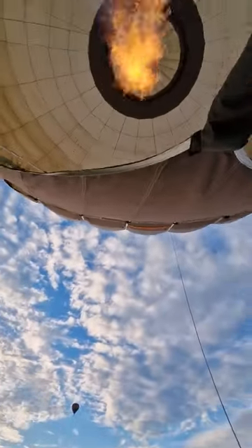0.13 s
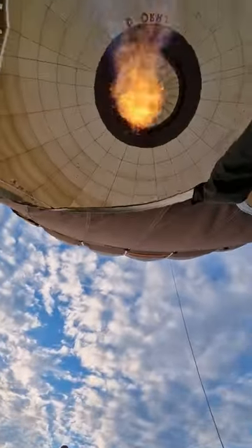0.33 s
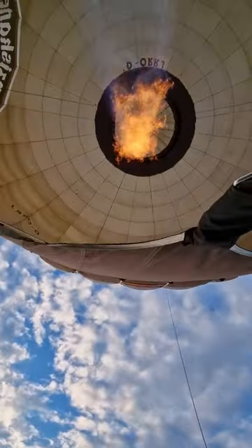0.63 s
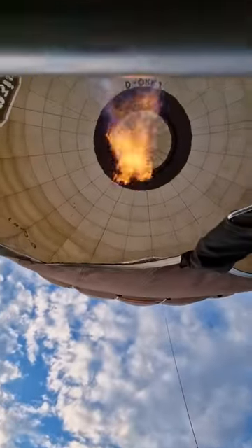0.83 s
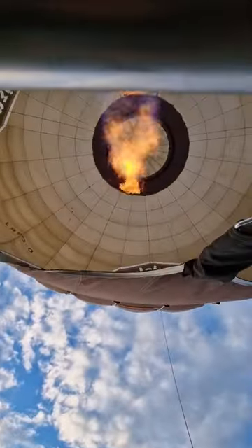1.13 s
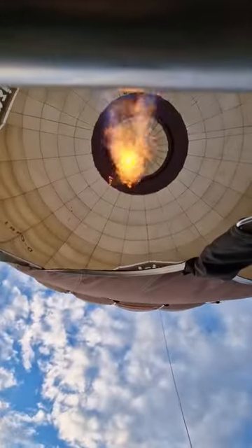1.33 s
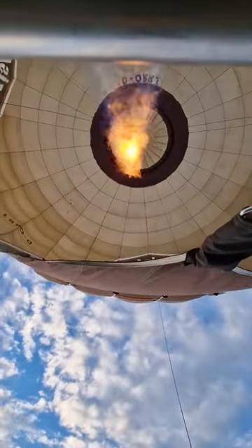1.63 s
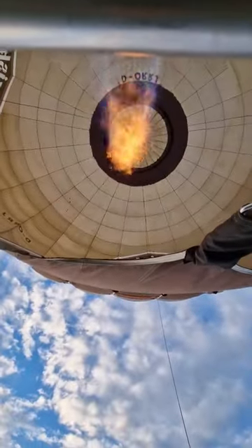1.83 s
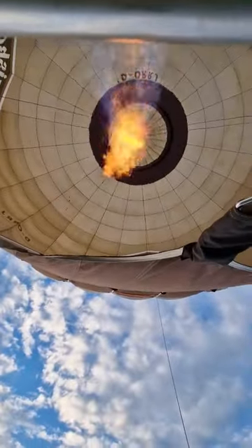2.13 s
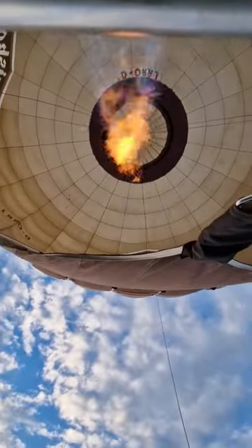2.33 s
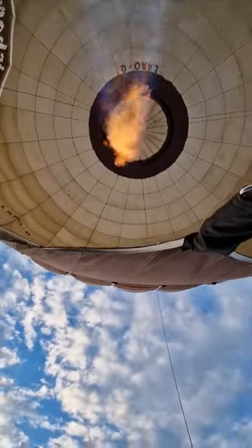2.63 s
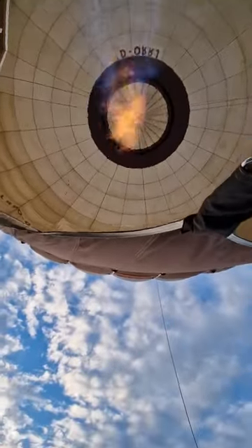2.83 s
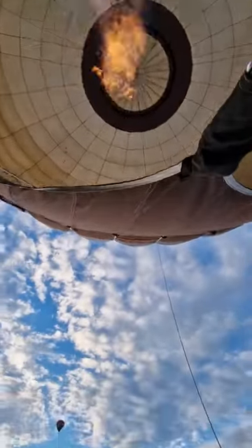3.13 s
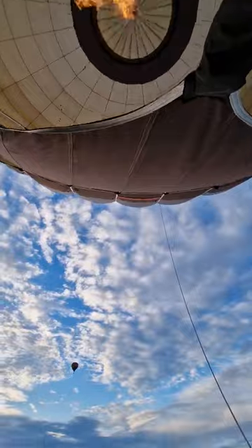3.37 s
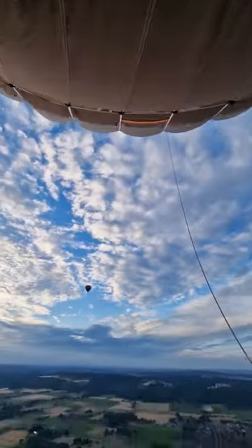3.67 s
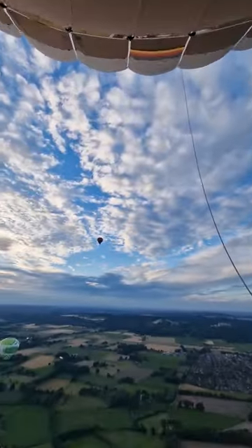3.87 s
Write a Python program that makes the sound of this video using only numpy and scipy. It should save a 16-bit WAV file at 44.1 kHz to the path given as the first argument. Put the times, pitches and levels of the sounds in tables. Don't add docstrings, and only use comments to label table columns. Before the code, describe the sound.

Loud steady gas flame roar and jet hiss from a balloon basket outdoors, captured close by a stereo phone, slightly stronger on the left; the valve shuts and only a thin, breathy pilot flame remains.

```python
import sys
import numpy as np
from scipy import signal
from scipy.fft import rfft, irfft
from scipy.io import wavfile
from scipy.ndimage import uniform_filter1d, minimum_filter1d, map_coordinates

SR = 44100
rng = np.random.default_rng(int(sys.argv[2]) if len(sys.argv) > 2 else 0)


def makeup_ratio(level_db):
    decades = np.asarray(level_db, float) / 20
    return 10 ** decades


def dump(signal):
    limited = np.clip(np.atleast_2d(signal).T, -1, 1)
    pcm = np.round(limited * 32767).astype(np.int16)
    wavfile.write(sys.argv[1], SR, pcm)


N = 176400
SECONDS = np.arange(N) / SR
HZ = np.maximum(np.arange(N // 2 + 1) * SR / N, 1)

# time in seconds, level in dB.
GAS_PRESSURE = [(0, 2), (1, 0.5), (2.7, -0.64), (2.95, -1.5), (3.2, -5.5), (3.4, -9), (3.5, -15.5),
                (3.56, -26), (3.62, -37), (3.75, -66), (4, -111)]
# pitch in Hz, dB of sound per dB of pressure.
PRESSURE_EFFECT = [(100, 0.25), (500, 0.51), (1500, 0.63), (6000, 0.86), (13000, 1.3)]
# pitch in Hz, level in dB.
FLAME_ROAR = [(25, -25), (45, -4), (65, 0.5), (200, -1), (330, -5), (550, -13), (1000, -19.5), (3000, -35)]
# pitch in Hz, level in dB.
JET_HISS = [(300, -49), (1200, -33.5), (2500, -26), (4000, -29), (6500, -24.5), (9000, -30.5), (12000, -27),
            (15500, -29.5)]
# pitch in Hz, width in Hz, boost in dB.
PILOT_HOLES = [(1110, 150, 2), (2210, 310, 5), (3200, 360, 9.5), (5200, 700, 9), (6050, 300, 7),
               (8320, 370, 13.5), (13600, 800, 9)]
# pitch in Hz, level in dB.
PILOT_BREATH = [(30, -7), (80, 4.5), (180, -4), (330, -8), (600, -17), (900, -33), (4000, -25),
                (15500, -32)]
# pitch in Hz, width in Hz, boost in dB.
PILOT_AT_RIGHT = [(890, 380, 11), (2210, 1500, 2), (5800, 3400, 2), (11000, 6400, 4)]
# pitch in Hz, width in Hz, change in dB.
LEFT_PORT = [(520, 115, 3), (698, 190, -3.5), (1078, 227, 6), (1206, 150, -1.5), (1478, 170, 5),
             (1750, 130, -1), (1970, 180, 1.5), (2670, 250, -3), (5000, 2300, -2), (6600, 400, 0.2),
             (7440, 820, 5), (8300, 270, 3), (8600, 620, 1), (14950, 3800, 6)]
RIGHT_PORT = [(471, 122, -4.5), (830, 190, -2.5), (1324, 380, 5.5), (1750, 430, 0), (2550, 370, -1.5),
              (4930, 1500, 4), (6300, 430, 0.5), (7300, 900, 1), (11800, 2000, 4), (15400, 2000, 4.5)]
# pitch in Hz, width in Hz, change in dB.
HAND_SHADOW = [(8250, 740, -10), (9620, 2300, -15.5)]
# pitch in Hz, share from 0 to 1.
ALIKE = [(60, .999), (500, 0.98), (1500, 0.85), (3000, 0.82), (5000, 0.67), (7500, 0.48), (8500, .15),
         (15000, 0.3)]
# time in seconds, lag of the right port in ms, share of the hand's shadow on it from 0 to 1.
TILT = [
    (0, .52, 0.6),
    (.3, .52, 0.7),
    (.7, 0.5, .97),
    (1.5, 0.5, .99),
    (2.5, 0.49, .99),
    (3.05, .512, 0.9),
    (3.52, 0.506, 0.7),
    (3.68, 0.41, 0.8),
    (4, 0.37, 0.8),
]
# pitch in Hz, lag in radians.
BENDING = [(60, -0.56), (200, -0.1847), (800, 0.24), (1500, 0.52), (2700, 0.37), (4000, 0.28), (5500, 0.6),
           (7600, 4.5)]

FLAME_OUT_S, FLAME_DIES_DB_S, FLAME_FADE_TOP_HZ = 3.545, 249, 2500
BURNER_DB, POPS_PER_S, POP_SPREAD_DB, POP_SHARE = -13.5, 900, 2.5, 0.11
SWELL_DB, NEIGHBOUR_DB, FLICKER_DB = 0.35, 0.65, 0.58
PILOT_DB, PILOT_FLUTTER_DB, PILOT_WAVER_DB, PILOT_GROWS_DB_S = -49, -3, 1.3, 7
PILOT_RISE_PER_S, PILOT_ALIKE, PILOT_SPLIT_HZ = 0.07, 0.63, 700
SWAY_MS, SWAYS_PER_S = 0.013, 14
RIGHT_DB, PEAK_LIMIT, TOP_HZ = -2, 0.95, 15550


def read(table, hz):
    pitches, values = np.array(table).T
    return np.interp(np.log(hz), np.log(pitches), values)


def bells(rows):
    return makeup_ratio(sum(db * np.exp(-4 * np.log(2) * ((HZ - hz) / width) ** 2) for hz, width, db in rows))


def walk(rate):
    hold = int(SR / rate)
    steps = np.repeat(rng.standard_normal(N // hold + 1), hold)
    smooth = uniform_filter1d(uniform_filter1d(steps, hold), hold)
    return np.sqrt(2) * smooth[:N]


def at_ports(source, treble_share):
    alike = read(ALIKE, HZ) * treble_share ** (HZ > 1000)
    tilt_s, tilt_lag_ms, _ = np.array(TILT).T
    lag_ms = np.interp(SECONDS, tilt_s, tilt_lag_ms) + SWAY_MS * walk(SWAYS_PER_S)
    late = map_coordinates(source, [np.arange(N) - lag_ms * SR / 1000], mode="wrap")
    bent = rfft(late) * np.exp(-1j * read(BENDING, HZ))
    common = np.array([rfft(source), bent])
    unrelated = rfft(rng.standard_normal((2, N)))
    return np.sqrt(alike) * common + np.sqrt(1 - alike) * unrelated


def coloured(ports, gain, db):
    return ports * gain * makeup_ratio(db) / np.sqrt(np.mean(gain ** 2))


def burning_gas():
    ignites = rng.random(N) < POPS_PER_S / SR
    pops = -1.0 * ignites * makeup_ratio(POP_SPREAD_DB * rng.exponential(size=N))
    rush = rng.standard_normal(N)
    return np.sqrt(POP_SHARE) * pops / pops.std() + np.sqrt(1 - POP_SHARE) * rush


def burner():
    pressure_db = np.interp(SECONDS, *np.array(GAS_PRESSURE).T)
    roar = makeup_ratio(read(FLAME_ROAR, HZ)) * (HZ < 6000)
    hiss = makeup_ratio(read(JET_HISS, HZ))
    full = coloured(at_ports(burning_gas(), 1.0), np.hypot(roar, hiss), BURNER_DB)
    since_out = np.maximum(SECONDS - FLAME_OUT_S, 0)
    out, swell, shared = 0, walk(1.558), walk(6)
    for k in range(15):
        hz = 40 * 2 ** (k * 2 / 3)
        edge = np.clip(np.log2(HZ / hz) * 3 / 2, -1 if k else 0, 1)
        band = irfft(full * np.cos(edge * np.pi / 2) ** 2, N)
        dying_db = -FLAME_DIES_DB_S * since_out * np.clip(1 - hz / FLAME_FADE_TOP_HZ, 0, 1)
        shared = np.sqrt(0.5) * (shared + walk(6.01))
        waver_db = SWELL_DB * swell + NEIGHBOUR_DB * shared + FLICKER_DB * walk(18)
        out = out + makeup_ratio(read(PRESSURE_EFFECT, hz) * pressure_db + dying_db + waver_db) * band
    return out


def pilot():
    colour = makeup_ratio(read(PILOT_BREATH, HZ)) * bells(PILOT_HOLES)
    full = coloured(at_ports(rng.standard_normal(N), PILOT_ALIKE), colour, PILOT_DB)
    full = full * np.array([np.ones(len(HZ)), bells(PILOT_AT_RIGHT)])
    low = 1 / (1 + (HZ / PILOT_SPLIT_HZ) ** 4)
    flutter = irfft(full * low, N)
    since = SECONDS - FLAME_OUT_S
    after = np.maximum(since, 0)
    clock = np.arange(N) + SR * PILOT_RISE_PER_S * (after ** 2 / 2 - 0.35 * since)
    steady = irfft(full * (1 - low), N)
    whistle = np.array([map_coordinates(port, [clock], mode="wrap") for port in steady])
    flutter = makeup_ratio(PILOT_FLUTTER_DB * walk(9)) * flutter
    return flutter + makeup_ratio(PILOT_WAVER_DB * walk(12) + PILOT_GROWS_DB_S * after) * whistle


def through(x, gain):
    finer_gain = np.repeat(gain, 2, axis=-1)[..., :N + 1]
    return irfft(rfft(x, 2 * N) * finer_gain, 2 * N)[..., :N]


def causal(gain):
    fold = irfft(np.log(gain), N)[:N // 2]
    return np.exp(rfft(2 * fold, N) - fold[0])


def shaded_by_hand(right):
    tilt_s, _, tilt_shade = np.array(TILT).T
    shade = np.interp(SECONDS, tilt_s, tilt_shade)
    return (1 - shade) * right + shade * through(right, bells(HAND_SHADOW))


def scene():
    ports = np.array([causal(bells(LEFT_PORT)), causal(bells(RIGHT_PORT)) * makeup_ratio(RIGHT_DB)])
    left, right = through(burner() + pilot(), ports)
    return np.array([left, shaded_by_hand(right)])


def band_limit(x):
    return signal.sosfilt(signal.butter(12, 16740, fs=SR, output="sos"), x)


def record(dry):
    room = np.minimum(PEAK_LIMIT / (np.abs(dry).max(axis=0) + 1e-9), 1)
    ducked = dry * uniform_filter1d(minimum_filter1d(room, size=401), size=400)
    top_cut = np.clip((TOP_HZ - HZ) / 90, 0, 1) ** 2
    return band_limit(through(ducked, top_cut))


dry = scene()
out = record(dry)
dump(out)
```